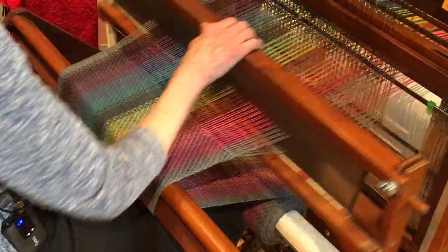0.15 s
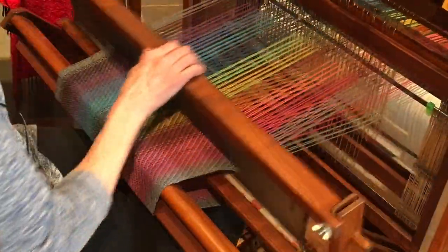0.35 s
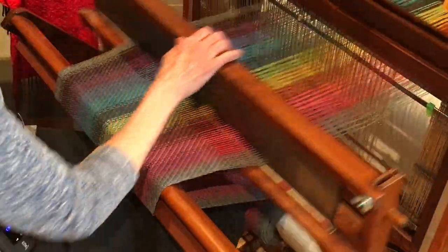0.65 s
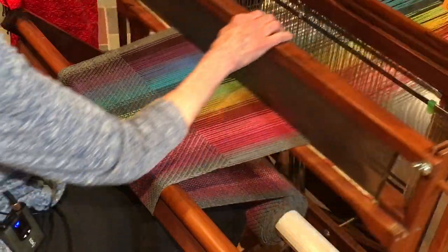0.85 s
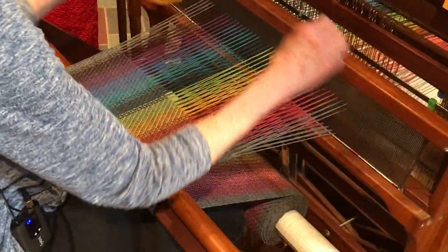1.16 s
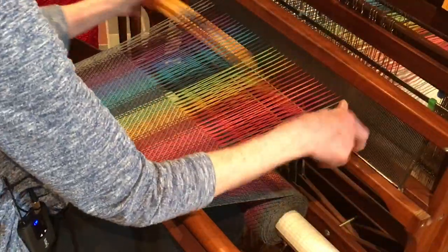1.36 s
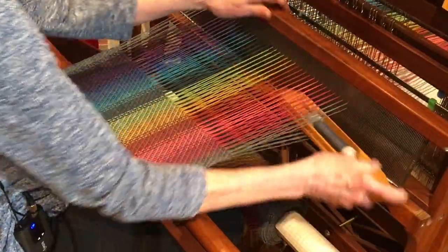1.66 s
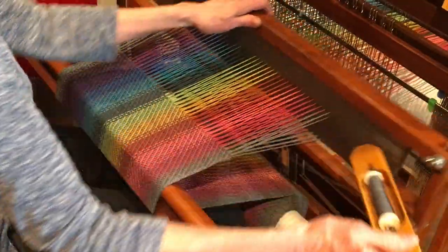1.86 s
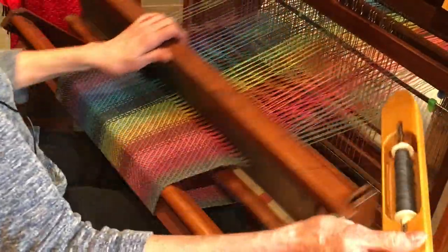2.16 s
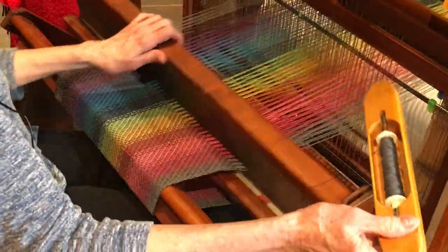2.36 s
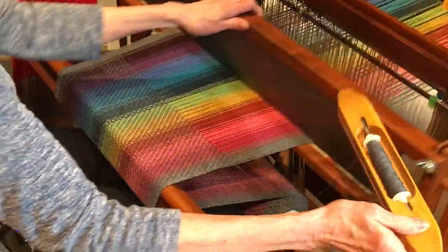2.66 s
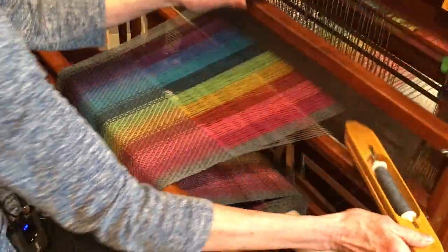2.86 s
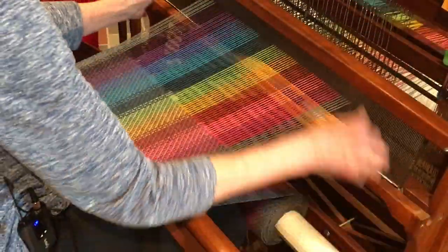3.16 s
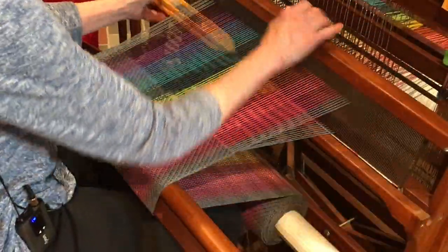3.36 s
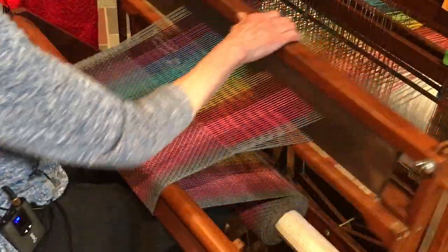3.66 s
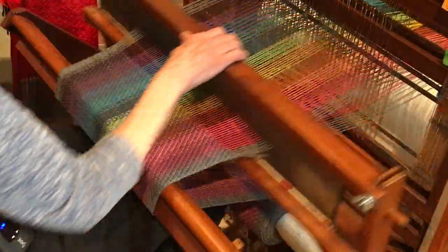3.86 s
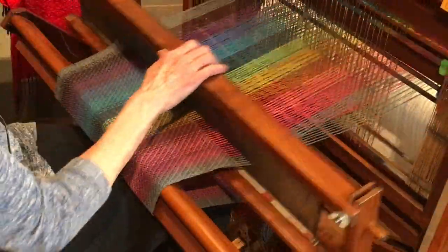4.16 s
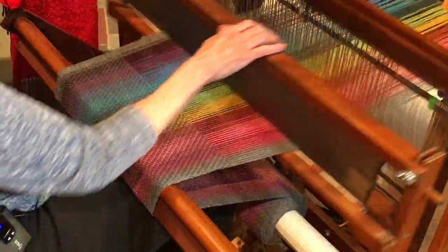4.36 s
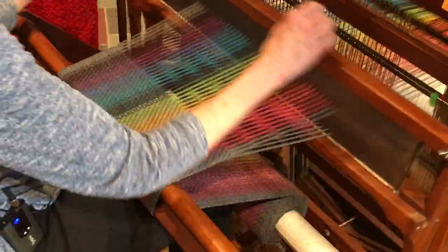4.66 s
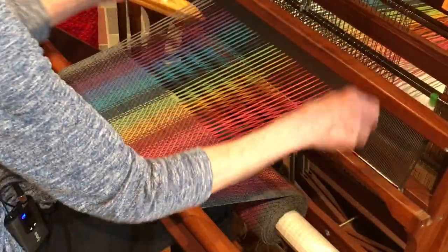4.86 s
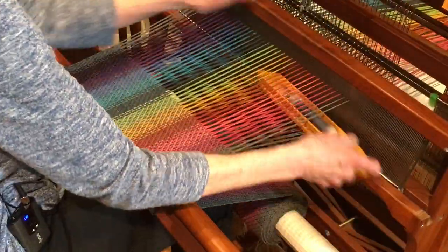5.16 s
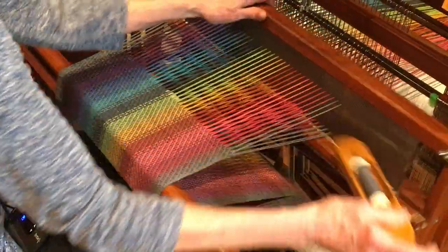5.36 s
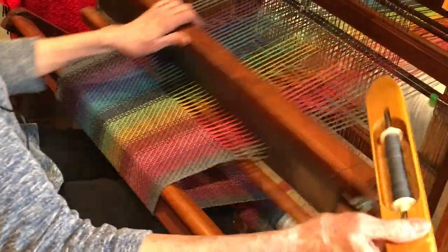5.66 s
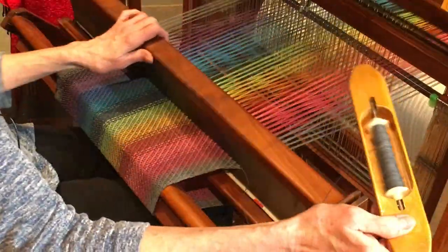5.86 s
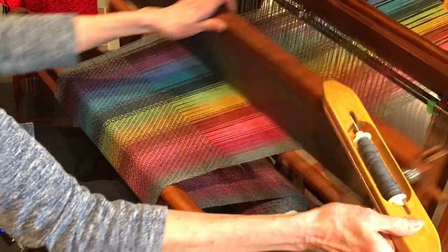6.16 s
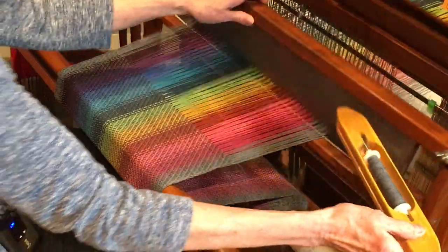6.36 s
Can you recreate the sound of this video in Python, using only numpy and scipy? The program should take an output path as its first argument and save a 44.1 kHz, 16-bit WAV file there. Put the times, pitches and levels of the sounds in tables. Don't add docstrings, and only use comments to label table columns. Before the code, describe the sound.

Close, dry recording of a wooden floor loom in a small quiet room. Light taps and bobbin rattle open, then a loud raspy beater stroke with snapping wires. The shuttle clacks across, the reed swishes with faint creaks, and sharp knocks lead into another pass. Clattering clicks, more strokes and a second flurry of clacks follow, ending in softer rasping. Faint hum and room tone lie underneath.

```python
import sys
import numpy as np
from scipy import signal
from scipy.fft import rfft, irfft, next_fast_len
from scipy.io import wavfile
from scipy.ndimage import uniform_filter1d, map_coordinates

SR = 44100
rng = np.random.default_rng(int(sys.argv[2]) if len(sys.argv) > 2 else 0)


def level_to_linear(level):
    exponent = np.asarray(level, float) / 20
    return 10 ** exponent


def int16_out(signal):
    q = np.round(np.clip(np.atleast_2d(signal).T, -1, 1) * 32767)
    wavfile.write(sys.argv[1], SR, q.astype(np.int16))


N = 287576
T = np.arange(N) / SR


def unit(x):
    return x / np.sqrt(np.mean(x ** 2) + 1e-20)


def along(points, hz):
    point_hz, value = np.transpose(points)
    return np.interp(np.log(hz + 1), np.log(point_hz + 1), value)


def wobble(rate_hz):
    knots = rng.standard_normal(int(N * rate_hz / SR) + 4)
    return map_coordinates(knots, [T * rate_hz])


def filtered(x, response):
    size = next_fast_len(N + SR // 2)
    hz = np.fft.rfftfreq(size, 1 / SR)
    return irfft(rfft(x, size) * response(hz), size)[..., :N]


def band(hz, lo_hz, hi_hz):
    highpass = 1j * hz / lo_hz / (1 + 1j * hz / lo_hz)
    return (highpass / (1 + 1j * hz / hi_hz)) ** 2


def crackle(patchy_db, tick_db, lumpy_db):
    z = signal.stft(rng.standard_normal(N), nperseg=64)[2]
    field = uniform_filter1d(rng.standard_normal(z.shape), size=4, axis=0)
    field = uniform_filter1d(field, size=3, axis=1)
    patches = signal.istft(z * level_to_linear(patchy_db * unit(field)), nperseg=64)[1][:N]
    return unit(patches * level_to_linear(tick_db * wobble(400) + lumpy_db * wobble(40)))


def chatter(length_s, count):
    t = np.arange(count) / SR
    strike = 1 + 1.22 * np.exp(-t / 0.00034)
    onset = 1 - np.exp(-t / 0.000068)
    release = level_to_linear(-7 * t / length_s - 10 * (t / length_s) ** 4)
    return rng.standard_normal(count) * strike * release * onset


# (frequency [Hz], density [dB per Hz])
AIR_SPECTRUM = [(12, -42), (20, -7), (61, 1.5), (234, -6), (759, -5.5), (1190, -7), (2390, -7.5),
                (3630, -12), (4670, -7), (7950, -10), (9400, -15), (14700, -18.5), (16000, -22)]
# (time [s], level [dB])
HUM_LEVEL = [
    (0.0, -76.5),
    (2.43, -63.5),
    (3.12, -70),
    (3.34, -69),
    (3.98, -80),
    (5.77, -62.5),
    (6.52, -72),
]
AIR_DB = -60.5


def air():
    tone = unit(filtered(rng.standard_normal(N), lambda f: level_to_linear(along(AIR_SPECTRUM, f))))
    time_s, level_db = np.transpose(HUM_LEVEL)
    hum_db = np.interp(T, time_s, level_db) - 1.0 + 0.59 * wobble(7.1)
    hum = np.sin(2 * np.pi * 60 * T + 0.5 * wobble(2.47)) * level_to_linear(hum_db)
    return level_to_linear(AIR_DB + 0.5 + 1.1 * wobble(0.79)) * tone + hum


# (frequency [Hz], t60 [s])
ROOM_T60 = [(200, 0.1), (2000, 0.42), (6000, 0.26), (14000, 0.059)]


def room(x):
    out, step = np.zeros(N + 2 * SR), SR // 4
    for i in range(0, N, step):
        hz, t, z = signal.stft(rng.standard_normal(SR // 2), SR, nperseg=256)
        decay = level_to_linear(-60 * t / along(ROOM_T60, hz)[:, None])
        tail = signal.istft(z * decay, SR, nperseg=256)[1]
        tail = tail * (1 - np.exp(-np.arange(len(tail)) / SR / 0.0033))
        wet = signal.fftconvolve(x[i:i + step], tail / np.linalg.norm(tail))
        out[i + 200:][:len(wet)] += wet
    return out[:N]


# (time [s], peak [dB], pitch [Hz], t60 [s])
WOOD_KNOCKS = [(1.3225, -34.5, 3520, 0.11), (1.3246, -34.5, 1750, 0.18), (2.5, -45, 1166, .009),
               (1.877, -19.5, 424, 0.004), (2.035, -38.5, 222, 0.017), (2.9172, -8.5, 1880, 0.0056),
               (2.918, -20.5, 996, 0.022), (2.937, -19.5, 1184, 0.022), (3.356, -25, 425, 0.019),
               (3.3565, -6, 880, 0.0017), (3.357, -43, 76, 0.12), (4.136, -39, 4520, 0.1),
               (4.7775, -34.5, 1110, 0.023), (5.0633, -18.5, 2175, 0.023), (5.064, -37, 1163, 0.058),
               (5.2556, -38, 1220, 0.023), (5.4004, -37, 1184, .03), (5.861, -32.5, 2380, 0.18)]


def knocks():
    out, t = np.zeros(N + SR), np.arange(SR // 5) / SR
    onset = 1 - np.exp(-t / 0.00048)
    for s, db, hz, t60_s in WOOD_KNOCKS:
        out[round(s * SR):][:len(t)] += level_to_linear(db - 60 * t / t60_s) * onset * np.sin(2 * np.pi * hz * t)
    return out[:N]


# (start [s], length [s], pitch [Hz], level [dB], roughness
CREAKY_TONES = [
    (2.169, 0.079, 731, -52.5, 0.74),
    (2.458, 0.048, 752, -47, 0.8),
    (2.669, 0.067, 738, -55, 0.83),
    (2.695, 0.099, 1455, -52.5, 0.45),
    (2.948, 0.1, 1200, -52, 2.15),
    (3.477, .09, 1183, -52, 1.04),
    (4.117, 0.117, 702, -48, 1.03),
    (6.075, 0.094, 745, -52.5, 1.8),
]
LONG_CREAK_S, CLIMB = 0.1, 0.22


def creaks():
    out = np.zeros(N)
    waver, grip = 0.03 * wobble(160), 0.7 * wobble(110)
    for s, length_s, hz, db, rough in CREAKY_TONES:
        u = np.clip((T - s) / length_s, 0, 1)
        climb = 1 + CLIMB * np.sqrt(u) * (length_s > LONG_CREAK_S)
        pitch_hz = hz * climb * (1 + rough * waver)
        swell = np.sqrt(np.abs(np.sin(np.pi * u))) * (u < 1)
        level = level_to_linear(db) * (1 + min(rough, 1) * grip) * swell
        out += level * np.sin(2 * np.pi * np.cumsum(pitch_hz) / SR)
    return out


RISE_SHAPE, HOLD_S, FADE_DB, FADE_SHAPE = 1.02, 0.016, 27.5, 0.86
USUAL_DB = -45
SHAKE_DB, SHAKE_GROWS, SHAKE_SWINGS = -51, 0.36, 0.61
FIZZ_DB, FIZZ_GROWS, FIZZ_SWINGS = -51.5, 0.58, 0.86


def stroke(s, rise_s, peak_db, fade_s, bright_db):
    gains, t = np.zeros((3, N + SR)), np.arange(SR) / SR
    swell_db = 20 * RISE_SHAPE * np.log10(np.clip(t / rise_s, 1e-4, 1))
    fading = np.maximum(t - rise_s - HOLD_S, 0) / fade_s
    shape_db = swell_db - FADE_DB * fading ** FADE_SHAPE
    extra_db = peak_db - USUAL_DB
    shake_db = SHAKE_DB + SHAKE_GROWS * extra_db - bright_db + SHAKE_SWINGS * shape_db
    fizz_db = FIZZ_DB + FIZZ_GROWS * extra_db + bright_db + FIZZ_SWINGS * shape_db
    gains[:, round(s * SR):][:, :SR] = level_to_linear([peak_db + shape_db, shake_db, fizz_db]) * (1 - t)
    return gains[:, :N]


# (start [s], rise [s], peak [dB],
# fade [s], brightness [dB])
LOOM_STROKES = [(0.289, 0.048, -51, 0.31, -1), (.645, 0.058, -31.5, 0.063, -7.5),
                (.74, 0.014, -47, 0.24, -2), (1.009, 0.0069, -39, 0.15, -7.5),
                (1.03, 0.049, -43, 0.21, 3.5), (1.319, 0.0063, -75, 0.42, -7.5),
                (1.6, 0.22, -70, 0.89, -0.5), (1.86, 0.031, -55.5, 0.2, -5), (2.132, 0.033, -50, 0.64, 2.5),
                (2.404, 0.066, -48, 0.41, -2), (2.688, 0.008, -62, 0.23, 5.5),
                (2.813, 0.049, -39, 0.21, -2), (2.913, 0.0066, -55, 0.16, -4.5),
                (3.079, 0.0046, -63, 0.12, -4), (3.898, 0.038, -49, 0.54, 1.5),
                (4.233, 0.012, -55.5, 0.9, -0.5), (4.3, 0.083, -62.5, 0.067, -2.5),
                (4.635, 0.012, -42, 0.27, -1), (4.65, 0.024, -42.5, 0.23, 2.5),
                (5.692, 0.091, -48, 0.41, 1.5), (6.042, 0.043, -58, 0.16, -2.5),
                (6.202, 0.061, -60, 0.38, 5), (6.37, 0.089, -45.5, 0.23, -8.5),
                (6.44, 0.057, -50.5, .4, 6.5)]
# (frequency [Hz], density [dB per Hz])
RASP_SPECTRUM = [(71, -20), (120, -15.5), (334, -15.5), (445, -8.5), (856, -1.5), (1580, -4.5), (1940, -3),
                 (3740, -5), (5990, 2), (8140, -1), (8840, -5), (11300, -9.5), (16000, -17.5)]


def warp():
    rasp, shake, fizz = sum(stroke(*row) for row in LOOM_STROKES)
    drag = crackle(2.8, tick_db=2.2, lumpy_db=1.2)

    def coloured(lo_hz, hi_hz):
        return unit(filtered(drag, lambda f: level_to_linear(along(RASP_SPECTRUM, f)) * np.abs(band(f, lo_hz, hi_hz)) ** 2))

    threads = level_to_linear(-0.5) * rasp * coloured(2600, 13800)
    timber = level_to_linear(-2.0) * shake * coloured(35, 1260)
    laths = level_to_linear(3.5) * np.sqrt(rasp * shake) * coloured(1730, 2860)
    thread_fizz = level_to_linear(-1.5) * fizz * coloured(14300, 26000)
    return threads + timber + laths + thread_fizz


# (time [s], peak [dB])
WIRE_SNAPS = [(0.301, -21.5), (0.3326, -19), (.3494, -33), (0.6625, -8.5), (.6737, -25), (0.6905, -1.5),
              (.698, -33), (0.707, -6.5), (1.0176, -38), (1.0355, -13), (1.0577, -15), (2.4175, -12.5),
              (2.4657, -9), (2.703, -20), (2.842, -23), (4.245, -31), (4.305, -17.5), (4.3628, -12.5),
              (5.717, -18.5), (6.083, -24), (6.231, -26.5)]
# (time [s], peak [dB])
LATH_CLAPS = [(0.326, -21), (.362, -19.5), (0.6321, -16.5), (.6619, -18), (0.6734, -17), (.7064, -38),
              (2.4656, -22.5), (2.822, -17), (2.8425, -36), (3.932, -17.5), (4.3608, -25), (4.5436, -23),
              (4.6411, -6.5), (5.6876, -33), (6.0474, -20.5), (6.081, -35), (6.3752, -23.5), (6.428, -17)]
LATH_WITH_WIRE_DB, WIRE_WITH_LATH_DB = -44, -13


def heddles():
    wire, lath = np.zeros((2, N + SR))
    snaps = [(s, db, db + LATH_WITH_WIRE_DB) for s, db in WIRE_SNAPS]
    snaps += [(s, db + WIRE_WITH_LATH_DB, db) for s, db in LATH_CLAPS]
    for s, wire_db, lath_db in snaps:
        i = round(s * SR)
        wire[i:][:1500] += level_to_linear(wire_db + 4) * chatter(0.017, count=1500)
        lath[i:][:1500] += level_to_linear(lath_db + 3) * chatter(0.013, count=1500)
    bright = filtered(wire[:N], lambda f: band(f, 5500, 6030) ** 2)
    dull = filtered(lath[:N], lambda f: band(f, 1030, 2190) ** 2)
    return bright + dull


# (frequency [Hz], bandwidth [Hz], level [dB])
SHUTTLE_MODES = [(1183, 43, 0), (1350, 1200, 12.5), (1750, 76, -7.5), (2270, 37, -14.5), (2280, 140, -8.5),
                 (2418, 79, -1.5), (2606, 66, -3), (3140, 390, -1.5), (3580, 59, -21.5), (4110, 150, -3),
                 (4565, 128, -1), (4950, 510, -1), (5400, 260, 0), (6080, 340, 0.5), (6980, 200, -6),
                 (7530, 270, -6.5), (7950, 81, -4.5), (8700, 2300, -29), (10300, 1000, -9),
                 (11840, 390, -5.5), (14300, 2500, -22)]
# (from [Hz], to [Hz], level [dB])
SHUTTLE_PARTS = [
    (1900, 3300, -4),
    (800, 1900, -3.5),
    (3300, 7000, -2),
    (7000, 16000, 1.5),
]


def shuttle_ring(levels_db, scatter_db):
    t = np.arange(SR // 12) / SR
    hz, width_hz, db = np.transpose(SHUTTLE_MODES)
    for (lo_hz, hi_hz, part_db), level_db in zip(SHUTTLE_PARTS, levels_db):
        db = db + (part_db + level_db) * ((hz >= lo_hz) & (hz < hi_hz))
    detune, luck = rng.standard_normal((2, len(hz)))
    swing = np.sin(2 * np.pi * np.outer(hz * (1 + 0.012 * detune), t))
    decay = np.exp(-np.pi * np.outer(width_hz, t))
    return level_to_linear(db + scatter_db * luck) @ (swing * decay)


# (time [s], peak [dB], spindle [dB], contact [s])
FLAT_CONTACTS = [(.1447, -36, 1, 0.0055), (1.3219, -13, -10, 0.012), (1.4326, -34, -18, 0.0079),
                 (1.6535, -26.5, -8, .01), (1.6601, -30.5, -2.5, 0.035), (1.8824, -25, -3, 0.0057),
                 (1.927, -39, 12, .0041), (3.0813, -15, -7, 0.0045), (3.273, -37, -18, 0.0037),
                 (3.3143, -24.5, -21, 0.0082), (4.132, -24.5, -18, 0.007), (4.9145, -18, -6.5, 0.0084),
                 (4.9486, -26.5, -17, 0.0036), (5.2555, -34.5, -6, 0.0032), (5.3853, -37, 7, 0.004),
                 (5.3988, -31, 9, 0.0091)]
# (time [s], peak [dB], spindle [dB], contact [s])
END_CONTACTS = [
    (.0199, -28, -18, 0.0039),
    (2.0331, -31.5, -6, 0.0018),
    (4.7772, -23.5, -15, 0.013),
    (4.8202, -21.5, -23, 0.0091),
    (4.882, -30.5, -11, 0.0093),
]
# (time [s], peak [dB], spindle [dB], contact [s])
NOSE_CONTACTS = [(.1286, -23.5, -7, 0.0037), (1.4565, -29, -3, 0.02), (1.4635, -18.5, 1.5, 0.013),
                 (1.5837, -25, -3, 0.0075), (3.2226, -38.5, -6, 0.013), (3.5418, -18, 1, .011),
                 (3.7355, -34.5, -7, 0.0063), (3.8297, -27.5, -14, 0.0015), (4.015, -31, -18, 0.0039),
                 (4.0356, -22.5, -3, 0.01), (4.8649, -22.5, -9, 0.0041), (5.115, -25, -18, 0.0069),
                 (5.854, -23, 0, 0.0098)]
# (time [s], peak [dB], spindle [dB], contact [s])
SPOOL_CONTACTS = [(.0473, -17.5, -4.5, 0.0086), (.0652, -18.5, -25, .005), (.0814, -35, -2, 0.017),
                  (1.471, -15.5, -20, 0.0053), (1.4964, -48, -1, 0.01), (1.509, -28.5, 3.5, 0.01),
                  (1.618, -23.5, -2.5, 0.018), (1.6934, -25, -12, 0.0069), (1.9392, -41.5, 14.5, 0.0064),
                  (3.0818, -14, -14, .0055), (3.3398, -21.5, -7.5, 0.012), (3.3887, -32, -0.5, .0078),
                  (3.459, -26, -3, 0.011), (3.4846, -26, -31, 0.0062), (3.5012, -11, -13.5, 0.018),
                  (3.563, -26, -19, .0043), (3.5989, -16.5, -15, 0.0074), (3.6631, -23.5, -14, 0.0032),
                  (3.7484, -47, -21, 0.0047), (4.0915, -17, -10, 0.012), (4.8494, -23, -13, .014),
                  (5.0632, -13.5, -10, 0.0054), (5.1009, -24, 7, 0.0087), (5.1238, -37, 2, .015),
                  (5.8728, -22.5, -19, .014)]


def clacks():
    out = np.zeros(N + SR)
    places = [(FLAT_CONTACTS, 0.83, -19), (END_CONTACTS, 0, -4.5),
              (NOSE_CONTACTS, -52, 0), (SPOOL_CONTACTS, -70, -25)]
    for contacts, hull_db, tip_db in places:
        for s, db, spindle_db, contact_s in contacts:
            ring = shuttle_ring(db + np.array([0, hull_db, spindle_db, tip_db]), scatter_db=3.0)
            clack = signal.fftconvolve(chatter(contact_s, count=1500), ring)
            out[round(s * SR):][:len(clack)] += level_to_linear(-25.5) * clack
    return out[:N]


# (time [s], rattle [dB], t60 [s])
BOBBIN_JOLTS = [(0.0, -38.5, 0.65), (1.152, -29.5, 0.4), (1.321, -53, .3), (1.459, -47, 8.8),
                (3.08, -46, 0.98), (3.2, -63, 3.15), (3.498, -43, 2.1), (4.082, -40, 0.67),
                (4.72, -50, 1.8), (5.06, -45, 0.33), (5.402, -37.5, 0.65), (5.855, -47, 0.97)]
HAND_STOPS = [1.98, 3.47, 3.9, 4.3, 4.96, 6.05]
SETTLE_DB_PER_S = 300


def bobbin():
    out = np.zeros(N + SR)
    rattle = crackle(3.1, tick_db=-1.5, lumpy_db=3) * level_to_linear(1.2 * wobble(30))
    for s, db, t60_s in BOBBIN_JOLTS:
        stop = min([x for x in HAND_STOPS if x > s] + [N / SR])
        settle_db = SETTLE_DB_PER_S * np.maximum(T - stop, 0)
        level = level_to_linear(db - 4.5 - 60 * np.abs(T - s) / t60_s - settle_db) * (T >= s)
        ring = shuttle_ring([0, -7, -9, -13], scatter_db=3)
        i = round(s * SR)
        buzz = signal.fftconvolve((level * rattle)[i:i + SR], ring / np.linalg.norm(ring))[:SR]
        out[i:][:len(buzz)] += buzz
    return out[:N]


def shuttle():
    return filtered(clacks() + bobbin(), lambda f: band(f, 807, 21000) ** 3)


def scene():
    loom, wood = shuttle() + heddles(), knocks() + creaks()
    echo = level_to_linear(-10.5) * room(loom + level_to_linear(-4.5) * wood)
    return (loom + wood + echo + warp() + air())[None]


def top_cut(x):
    return signal.sosfilt(signal.butter(12, 16690, fs=SR, output="sos"), x)


def record(dry):
    mix = filtered(dry, lambda f: f < 16100)
    return top_cut(mix)


dry = scene()
out = record(dry)
int16_out(out)
```